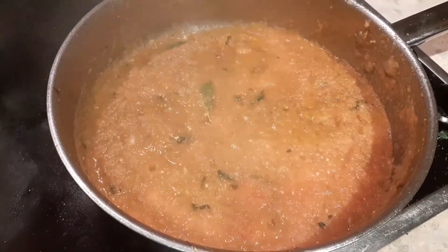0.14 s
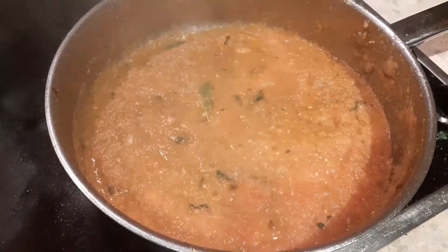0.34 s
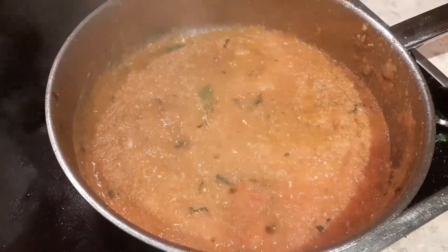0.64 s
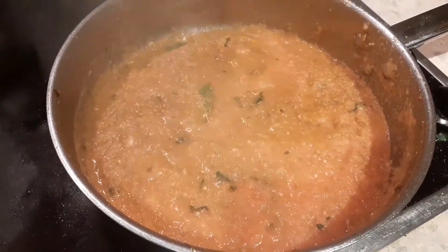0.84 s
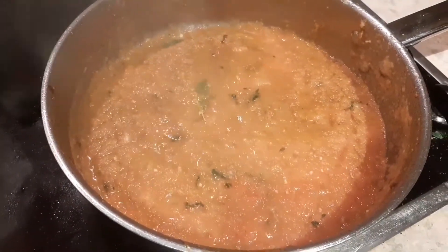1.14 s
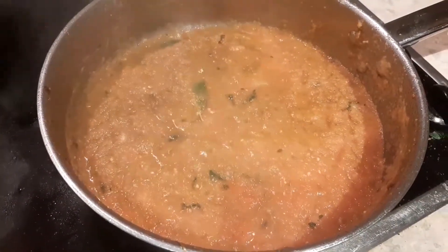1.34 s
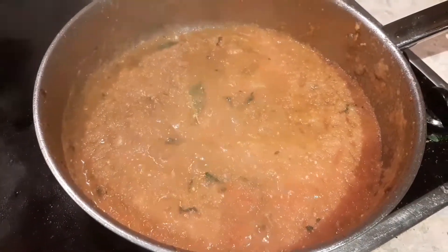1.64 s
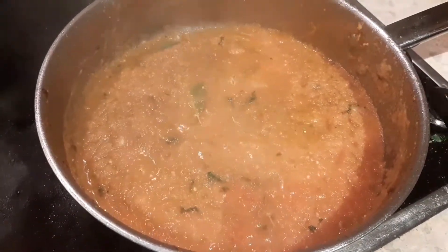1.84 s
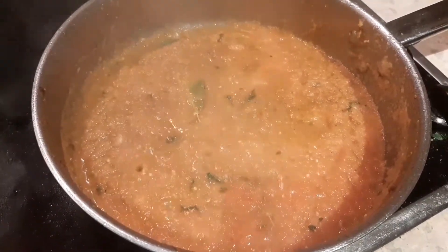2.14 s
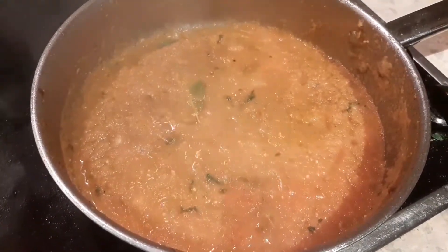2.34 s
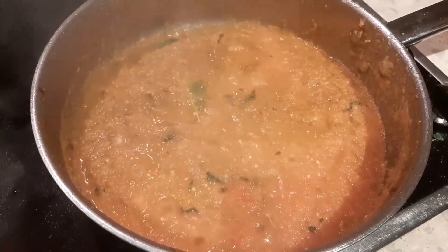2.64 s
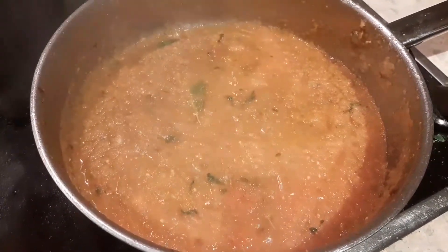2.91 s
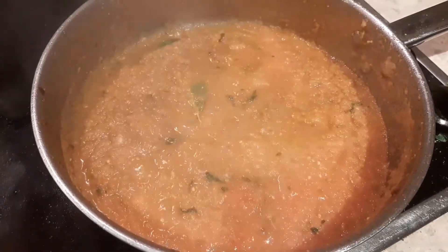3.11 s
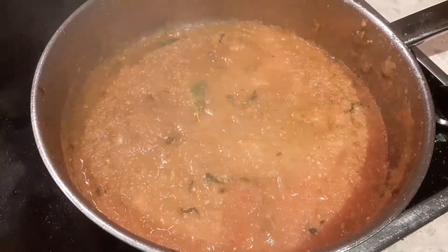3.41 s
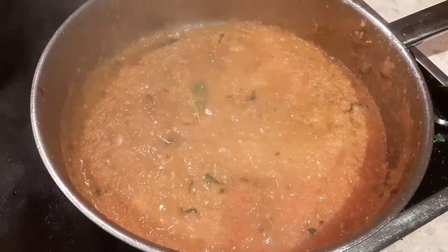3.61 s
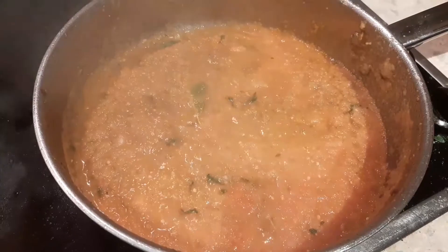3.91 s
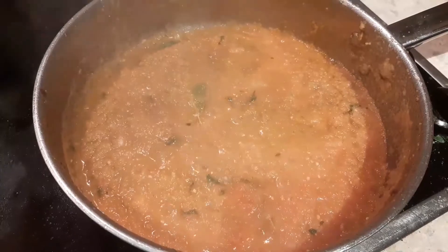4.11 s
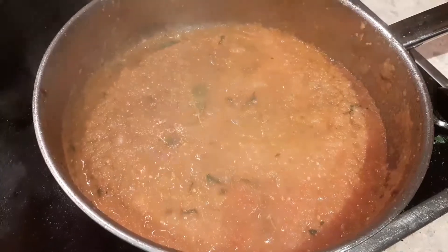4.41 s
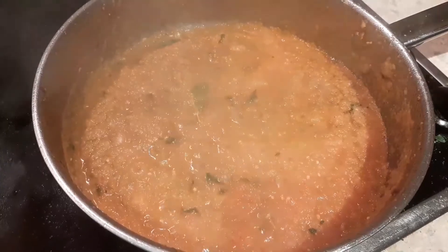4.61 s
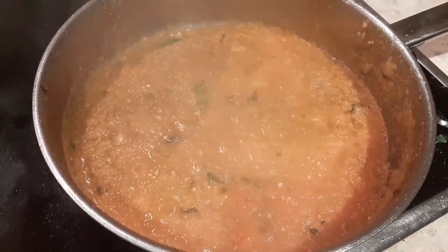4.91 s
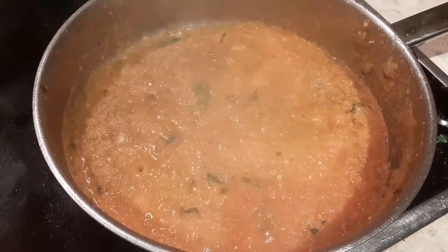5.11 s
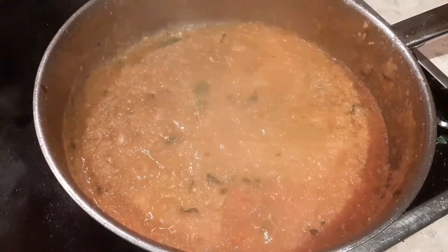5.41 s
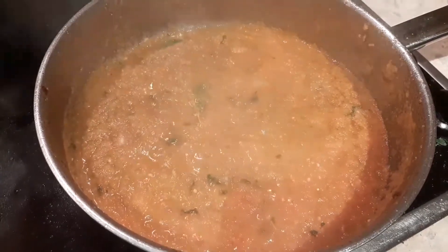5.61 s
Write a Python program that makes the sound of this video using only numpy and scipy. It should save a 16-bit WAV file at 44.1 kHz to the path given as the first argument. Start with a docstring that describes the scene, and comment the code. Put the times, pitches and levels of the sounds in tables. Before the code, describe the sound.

Thick sauce simmers in a steel pan with soft uneven bubbling while cutlery clinks and knocks close by in a small hard kitchen.

```python
"""In a small hard kitchen, thick sauce simmers in a steel pan: banded grains, pan resonances and noise swells.
A steady rush lies under it: patchy low rumble, and a fine treble hiss that creeps up.
Near by, steel cutlery clinks and knocks: struck modes and dying noise, with the room's reflections; dull thuds.
One microphone feeds both channels; a separate faint treble noise is added with opposite sign in each."""
import sys
import numpy as np
from scipy import signal
from scipy.io import wavfile

SR = 44100
rng = np.random.default_rng(int(sys.argv[2]) if len(sys.argv) > 2 else 0)


def wav_out(sig):
    """Save sig, one row per channel (or a flat mono array), as 16-bit PCM at SR to the path in sys.argv[1]."""
    wavfile.write(sys.argv[1], SR, np.round(np.clip(np.atleast_2d(sig).T, -1, 1) * 32767).astype(np.int16))


N = 253676   # length in samples


def from_db(db):
    """Gain of a level in dB."""
    return 10 ** (np.asarray(db) / 20)


def rms_one(x):
    """Scale to rms 1."""
    return x / np.sqrt(np.mean(x ** 2) + 1e-20)


def in_time(rows):
    """Table columns after start_s as one value per sample, in straight lines between rows."""
    start_s, *columns = np.transpose(rows)
    return [np.interp(np.arange(N) / SR, start_s, column) for column in columns]


def at_hz(points, hz):
    """Read the second column of a table on a log-frequency axis."""
    table_hz, values = np.array(points).T
    return np.interp(np.log(hz), np.log(table_hz), values)


def butter(x, order, hz, kind):
    """Butterworth filter: low, high or band."""
    return signal.sosfilt(signal.butter(order, hz, kind, fs=SR, output="sos"), x)


def drift(rate_hz):
    """Slow random wander of rms 1: noise through two equal low-pass poles at rate_hz."""
    step = 40   # samples between the slow values
    pole = np.exp(-2 * np.pi * rate_hz * step / SR)
    white = rng.standard_normal(N // step + 2002)
    slow = signal.lfilter([1], [1, -2 * pole, pole * pole], white)[2000:]   # the filter has settled
    return np.interp(np.arange(N) / step, np.arange(len(slow)), rms_one(slow))


def bands(x, low_hz, high_hz):
    """Third-octave bands of two alternating signals, with their centres in Hz."""
    edges = low_hz * 2 ** np.arange(0, np.log2(high_hz / low_hz) + .01, 1 / 3)
    for k, (low, high) in enumerate(zip(edges, edges[1:])):
        yield np.sqrt(low * high), butter(x[k % 2], 2, [low, high], "band")


def patchy(excite, spectrum, together_db, own_db):
    """Colour an excitation; bands swell partly together, partly alone; rms 1."""
    shared = drift(6.1)
    low_hz, high_hz = spectrum[0][0], min(spectrum[-1][0], 19000)
    out = 0
    for hz, band in bands(excite, low_hz, high_hz):
        level_db = at_hz(spectrum, hz) + together_db * shared + own_db * drift(3.8)
        out = out + from_db(level_db) * band
    return rms_one(out)


def grains(per_s, spread_db, noise_share):
    """Clicks of uneven size and either sign over a bed of noise, two draws; noise_share is of the power."""
    sizes = from_db(spread_db * np.minimum(rng.exponential(1, (2, N)), 5))
    signed = sizes * rng.choice([-1, 1], (2, N))
    pops = rms_one(signed * (rng.random((2, N)) < per_s / SR))
    return np.sqrt(1 - noise_share) * pops + np.sqrt(noise_share) * rng.standard_normal((2, N))


def puff(white, low_hz, high_hz, swell_s, t60_s):
    """Band noise that swells and dies; peak 1."""
    t = np.arange(len(white)) / SR
    shape = (1 - np.exp(-t / max(swell_s, .001))) * from_db(-60 * t / t60_s)
    sound = shape * butter(white, 2, [low_hz, high_hz], "band")
    return sound / np.max(np.abs(sound))


def add(out, start_s, sound):
    """Mix a sound in at a time."""
    i = round(start_s * SR)
    out[i:i + len(sound)] += sound[:N - i]


# narrow resonances of the pan: (pitch_hz, width_hz, level_db: mean, re bubbling)
PAN_RESONANCES = [(536.4, 33, -7.5), (943, 32, -10.5), (1299, 24, -12), (1994, 150, -10.5),
                  (4350, 150, -15)]


def pan_hum():
    """The simmer keeps a few narrow resonances of the pan sounding: noise through two-pole resonators."""
    out = 0
    for pitch_hz, width_hz, level_db in PAN_RESONANCES:
        pole = np.exp(-np.pi * width_hz / SR)
        feedback = [1, -2 * pole * np.cos(2 * np.pi * pitch_hz / SR), pole * pole]
        ring = signal.lfilter([1, 0, -1], feedback, rng.standard_normal(N))
        out = out + from_db(level_db + 1.7 * drift(3.1)) * rms_one(ring)
    return out


# colour of the soft bubbling, before levelling: (pitch_hz, level_db: per Hz)
BUBBLING_SPECTRUM = [(150, -74), (250, -29), (306, -6.5), (386, 1.5), (437, 1), (535, 0.5), (697, 0.5),
                     (1300, -1.5), (1600, -11), (2080, -12), (3520, -120)]


def bubbling():
    """Soft bubbling: many small grains over noise, in low and middle bands that swell unevenly; rms 1."""
    grain = grains(per_s=250, spread_db=2.5, noise_share=0.89)
    return patchy(grain, BUBBLING_SPECTRUM, together_db=1.23, own_db=2.0)


# colour of the rustle above the bubbling, before levelling: (pitch_hz, level_db: per Hz)
RUSTLE_SPECTRUM = [(710, -6), (1200, 0.5), (1980, -0.5), (2530, -1.5), (2870, 0.5), (3740, -5.5),
                   (4240, -7), (7000, -14.5), (9100, -31), (15400, -120)]


def rustle():
    """Rustle: denser and more uneven grains over noise, in brighter bands; rms 1."""
    grain = grains(per_s=600, spread_db=5.5, noise_share=0.76)
    return patchy(grain, RUSTLE_SPECTRUM, together_db=1.4, own_db=1.9)


# course of the simmer: (start_s, bubbling_db, rustle_db)
SIMMER_LEVELS = [(0, -50.5, -51), (.85, -49.5, -48), (1.17, -52, -49.5), (1.65, -49, -49),
                 (2.03, -52.5, -47.5), (2.77, -51, -46), (3.1, -52.5, -48.5), (3.38, -50, -42),
                 (3.55, -50.5, -50), (3.88, -46.5, -47.5), (4.2, -51, -46), (4.93, -47.5, -50.5),
                 (5.24, -50, -45), (5.75, -49.5, -53.5)]


def simmer():
    """Bubbling and pan hum share one level course; the rustle rises and falls on its own."""
    bubbling_db, rustle_db = in_time(SIMMER_LEVELS)
    return from_db(bubbling_db) * (bubbling() + pan_hum()) + from_db(rustle_db) * rustle()


# colour of the rumble, before levelling: (pitch_hz, level_db: per Hz)
RUMBLE_SPECTRUM = [(24, -44), (40, -9), (320, -0.5), (420, -8), (700, -120)]
# course of the rumble: (start_s, level_db)
RUMBLE_COURSE = [(0.0, -67), (0.45, -62), (0.72, -61.5), (2.8, -64), (3.55, -63), (3.65, -58.5),
                 (5.24, -66), (5.75, -58.5)]


def rumble():
    """Low rumble: noise in patchy bass bands, its level wandering."""
    level_db, = in_time(RUMBLE_COURSE)
    noise = rng.standard_normal((2, N))
    return from_db(level_db) * patchy(noise, RUMBLE_SPECTRUM, together_db=-1.5, own_db=3.0)


# colour of the hiss, before levelling: (pitch_hz, level_db: per Hz)
HISS_SPECTRUM = [(3000, -6), (6000, -1.5), (10000, -2), (15000, -9)]
HISS_START_DB, HISS_CREEP_DB_PER_S = -57.5, .55
OPPOSED_DB = -14   # separate noise of opposite sign, re hiss
TREBLE_TOP_HZ = 15650   # 40 dB down from here up


def hiss():
    """Both channels carry one fine treble hiss that creeps up; separate opposed noise rises with it."""
    spectrum = HISS_SPECTRUM + [(19000, HISS_SPECTRUM[-1][1])]
    fine_hiss = patchy(rng.standard_normal((2, N)), spectrum, together_db=.3, own_db=.2)
    opposed = rms_one(butter(rng.standard_normal(N), 4, 9000, "high")) * [[1], [-1]]
    treble = fine_hiss + from_db(OPPOSED_DB) * opposed
    top = signal.cheby2(12, 40, TREBLE_TOP_HZ, fs=SR, output="sos")
    level_db = HISS_START_DB + HISS_CREEP_DB_PER_S * np.arange(N) / SR
    return from_db(level_db) * signal.sosfilt(top, treble)


# soft bursts in the sauce: (start_s, peak_db, pitch_hz: centre, t60_s)
SAUCE_BURSTS = [(.105, -38, 603, 0.22), (.446, -37, 950, 0.16), (.694, -36.5, 576, 0.081),
                (.775, -39, 1710, .15), (.895, -39, 905, 0.12), (1.165, -39.5, 563, .15),
                (2.181, -35.5, 510, 0.14), (2.335, -41, 400, 0.17), (2.574, -34, 1750, 0.058),
                (2.794, -33.5, 1100, 0.19), (2.904, -35.5, 950, .11), (3.6, -37.5, 427, .27),
                (3.86, -35.5, 460, 0.11), (4.022, -39, 1440, 0.1), (4.088, -40, 1300, 0.18),
                (4.128, -37, 2350, 0.062), (4.815, -30, 1990, 0.48), (4.868, -26.5, 1060, 0.081),
                (4.922, -22, 2240, 0.044), (5.0, -38.5, 593, 0.086), (5.15, -32, 1070, 0.057),
                (5.285, -43, 1220, .14), (5.509, -36, 2100, 0.54), (5.599, -36, 1880, .43),
                (5.689, -36.5, 1850, .33)]
SWELL_PER_S = 0.28   # long bursts swell slowly: swell_s = this x t60_s squared


def bursts():
    """A fat bubble breaks: a swell of noise round its own pitch."""
    out = np.zeros(N)
    whites = rng.standard_normal((len(SAUCE_BURSTS), SR // 3))
    for (start_s, peak_db, pitch_hz, t60_s), white in zip(SAUCE_BURSTS, whites):
        swell_s = SWELL_PER_S * t60_s ** 2
        add(out, start_s, from_db(peak_db) * puff(white, pitch_hz / 1.38, pitch_hz * 1.375, swell_s, t60_s))
    return out


# a hard contact has less knock and a clearer ring: (dB when soft, dB when hard)
KNOCK_DB, CLEAR_RING_DB = (0.5, -25.5), (-5, -2.5)   # re side ring, re clatter
OVERTONE_DB = (-11, -21.5)   # re the mean of clack and high bend
TWIST_DB = -2.5   # re the mean of side ring and high bend


def family_levels(low_db, side_db, clack_db, main_db, high_db, hardness):
    """Level of the eight mode families, and of their clear ring, for one contact."""
    knock, clear, overtone = (soft + (hard - soft) * hardness
                              for soft, hard in (KNOCK_DB, CLEAR_RING_DB, OVERTONE_DB))
    knock_db = side_db + knock
    twist_db = (side_db + high_db) / 2 + TWIST_DB
    overtone_db = (clack_db + high_db) / 2 + overtone
    return [knock_db, low_db, side_db, clack_db, main_db, twist_db, high_db, overtone_db], clear


# cutlery contacts: (start_s, low_bend_db, side_ring_db, clack_db, main_bend_db, high_bend_db,
# hardness: 0-1, low_bend_hz, main_bend_hz, grip: factor on t60); the dB set each family's strength
CONTACTS = [(.3087, -54, -53, -47, -51, -53, 0.4, 2070, 4790, 0.69),
            (1.262, -36.5, -40.5, -27.5, -35.5, -39.5, 0.56, 2005, 4650, 0.56),
            (1.7414, -64, -55, -54, -49.5, -50, 0.1, 1750, 4800, .6),
            (2.0903, -43, -40.5, -32.5, -41.5, -47, 0.64, 1815, 4660, 0.52),
            (2.2944, -48, -41, -41, -40.5, -55.5, .45, 1860, 4640, 0.51),
            (2.4177, -68, -62, -60, -61, -51, .1, 1720, 4500, 0.46),
            (2.4666, -48, -39.5, -42, -35.5, -48, 0.23, 1774, 4610, 0.63),
            (2.6007, -46, -32, -41, -29.5, -38.5, 0.14, 1810, 4680, 0.66),
            (2.7105, -51, -51.5, -53.5, -47, -53.5, 0.14, 1970, 4570, 0.88),
            (2.7825, -41.5, -49, -51, -59, -60, 0, 1757, 4700, 1.2),
            (2.8883, -48, -55, -53, -63, -65, .25, 1840, 4530, 1.4),
            (3.1491, -32.5, -34.5, -27.5, -33.5, -26, 1, 1920, 4840, 1),
            (3.1934, -47, -53, -44, -38, -48, .1, 1885, 4700, .71),
            (3.2212, -30, -24, -19.5, -25, -27.5, 0.1, 1865, 4720, 0.5),
            (3.299, -38.5, -26.5, -32, -27.5, -38.5, .85, 1803, 4890, 1),
            (3.5349, -32.5, -34, -26, -30, -35, 0.66, 1850, 4780, 0.97),
            (3.5498, -32, -21.5, -27, -33, -35.5, 0.3, 1825, 4780, 0.89),
            (3.7561, -30.5, -28, -28.5, -22, -26, 0.6, 1887, 4780, 1.02),
            (3.8074, -36, -19, -23.5, -20.5, -27.5, 0.31, 1783, 4876, 0.93),
            (4.2028, -53, -44.5, -57, -59, -66, 0.4, 1668, 4690, 1.3),
            (4.3638, -40, -47.5, -63.5, -65.5, -61.5, 0, 1732, 4700, 1),
            (4.4107, -30.5, -32.5, -33, -30, -24, 0.94, 1936, 4710, 1.13),
            (4.4173, -31, -36, -33, -29, -38, 0.14, 1934, 4560, 0.82),
            (4.5949, -72, -43, -58, -75, -70, 1, 1850, 4700, 0.75),
            (4.8982, -26, -22.5, -18, -39, -64, 0.7, 1714, 4580, .36),
            (4.9185, -43, -27, -34, -43, -46, 0.13, 1900, 4890, 0.43),
            (5.3482, -51, -41.5, -37, -42, -53, .2, 1930, 4820, 0.47),
            (5.447, -42, -44.5, -44, -58.5, -52, 0.2, 2160, 4860, 1),
            (5.475, -46, -37.5, -48, -52, -62, 0, 2000, 4730, 0.47),
            (5.5024, -49, -67, -59, -50, -63, 0.1, 2110, 4770, 0.89)]
# modes of knock, low bend, side ring, clack, main bend, twist, high bend and overtones,
# before each contact retunes and damps them: (pitch_hz, level_db: re family, t60_s)
MODE_FAMILIES = [
    [(1032, -2.5, 0.022), (1379, 3.5, 0.059)],
    [(1814, 4, 0.079), (1905, 2.5, 0.37), (2007, 3.9, 0.2)],
    [(2695, 3, 0.071), (2993, 11, 0.029), (3110, 3, 0.027), (3267, 4.2, 0.034)],
    [(4180, 0.5, 0.02), (4173, 6.5, 0.044)],
    [(4570, -0.5, 0.027), (4720, 0, 0.082), (4823, 8, 0.17), (4800, 5, 0.084), (5260, 2.5, 0.042)],
    [(6470, 3.5, 0.09), (6600, -8, 0.054), (7310, -1.5, 0.03)],
    [(8580, 4, 0.034), (8720, 7.5, 0.042)],
    [(9730, -3.5, 0.14), (11240, -2, 0.084), (13400, -4, .04), (14850, -5, 0.12)],
]
# many small modes round each family, heard as dying noise: (low_hz, high_hz, level_db: re family)
CLATTER_BANDS = [(920, 2030, 3.5), (1360, 2470, 2), (2110, 3700, 2), (3390, 4230, 2), (4550, 5810, -12),
                 (5460, 7830, 3), (8300, 8360, -2), (9700, 13000, -1)]
LOW_BEND_HZ, MAIN_BEND_HZ = 1900, 4800   # the two bends are retuned from here to each piece
CLATTER_T60_S, CRACK_T60_S = 0.042, 0.0045   # grip scales the clatter's only
CRACK_DB = 9   # re clatter
CONTACT_S = 0.000074   # time constant of the attack
RATTLE, RATTLE_HZ = 0.66, 122   # rms depth of the flutter, and its top speed


def cutlery():
    """Each contact rings all mode families and clatter at its row's levels; hardness sets knock and ring."""
    out, t = np.zeros(N), np.arange(SR // 4) / SR
    modes = np.array([mode for family in MODE_FAMILIES for mode in family])
    counts = [len(family) for family in MODE_FAMILIES]
    signs = (-1) ** np.arange(len(modes))   # neighbouring modes start in opposite directions
    luck = rng.normal(0, 1, (len(CONTACTS), 2, len(modes)))
    white = rng.standard_normal((len(CONTACTS), SR // 10))
    clatter = []
    for low_hz, high_hz, level_db in CLATTER_BANDS:
        even = np.sqrt(SR / 2 / (high_hz - low_hz))   # equal power whatever the width
        clatter.append(from_db(level_db) * even * butter(white, 3, [low_hz, high_hz], "band"))
    attack = (1 - np.exp(-t / CONTACT_S)) * np.minimum(1, 20 * (t[-1] - t))   # fades out at the end
    # a ringing piece chatters on its neighbours
    chatter = rms_one(butter(rng.standard_normal((len(modes), N + len(t))), 2, RATTLE_HZ, "low"))
    for k, (start_s, *strike, low_bend_hz, main_bend_hz, grip) in enumerate(CONTACTS):
        family_db, ring_db = family_levels(*strike)
        mode_db = ring_db + modes[:, 1] + np.repeat(family_db, counts) + 1.5 * luck[k, 0]
        level = signs * from_db(mode_db)
        retune = [1, low_bend_hz / LOW_BEND_HZ, 1, 1, main_bend_hz / MAIN_BEND_HZ, 1, 1, 1]
        hz = modes[:, 0] * np.repeat(retune, counts) * (1 + 0.0056 * luck[k, 1])
        decay = from_db(-60 * t / (modes[:, 2:] * grip))
        i = round(start_s * SR)
        flutter = 1 + RATTLE * chatter[:, i:i + len(t)]
        ring = level @ (flutter * np.sin(2 * np.pi * hz[:, None] * t) * decay)
        add(out, start_s, attack * ring)
        noise = sum(from_db(db) * band[k] for db, band in zip(family_db, clatter))
        dying = from_db(-60 * t / (CLATTER_T60_S * grip)) + from_db(CRACK_DB - 60 * t / CRACK_T60_S)
        add(out, start_s, noise * (attack * dying)[:SR // 10])
    return butter(out, 4, 750, "high")


# how long the kitchen rings: (pitch_hz, t60_s)
ROOM_DECAY = [(500, 0.51), (2000, 0.2), (5000, 0.24), (10000, 0.21)]
ROOM_DB, ROOM_GAP_S = -6.5, .004   # the reflections' level re direct sound for noise, and their delay


def kitchen(x):
    """Dense reflections that die away band by band after a short gap."""
    t = np.arange(SR // 2) / SR
    noise = rng.standard_normal((2, len(t)))
    tail = sum(band * from_db(-60 * t / at_hz(ROOM_DECAY, hz)) for hz, band in bands(noise, 200, 17500))
    tail *= t > ROOM_GAP_S
    return from_db(ROOM_DB) * signal.fftconvolve(x, tail / np.sqrt(np.sum(tail ** 2)))[:N]


# soft low bumps: (start_s, peak_db)
LOW_BUMPS = [(.885, -39.5), (1.815, -34), (3.56, -40), (3.854, -47), (4.222, -49), (5, -37)]


def bumps():
    """Dull thuds: low noise that swells for a moment and dies."""
    out = np.zeros(N)
    whites = rng.standard_normal((len(LOW_BUMPS), SR // 3))
    for (start_s, peak_db), white in zip(LOW_BUMPS, whites):
        thud = puff(white, low_hz=100, high_hz=520, swell_s=0.0028, t60_s=.21)
        add(out, start_s, from_db(peak_db) * thud)
    return out


def scene():
    """Sauce, rumble, cutlery with its room, and thuds alike in both channels, with the hiss."""
    sauce = simmer() + bursts()
    rush = rumble() + hiss()
    steel = cutlery()
    return sauce + rush + steel + kitchen(steel) + bumps()


def record(dry):
    """The top is cut steeply: 70 dB down from 16770 Hz up."""
    return signal.sosfilt(signal.cheby2(12, 70, 16770, fs=SR, output="sos"), dry)


dry = scene()
out = record(dry)
wav_out(out)
```